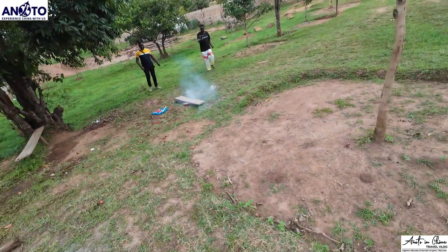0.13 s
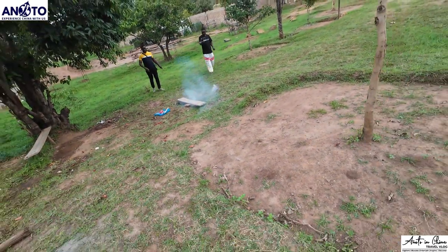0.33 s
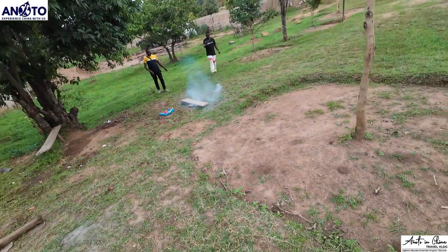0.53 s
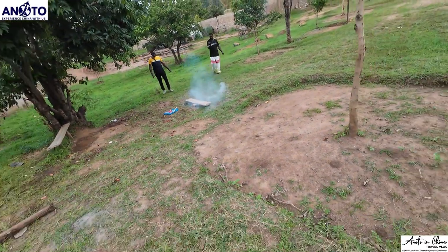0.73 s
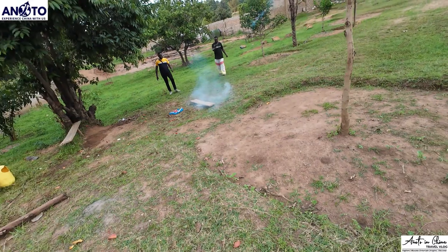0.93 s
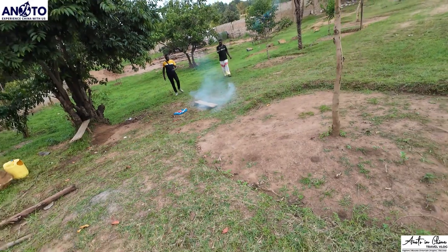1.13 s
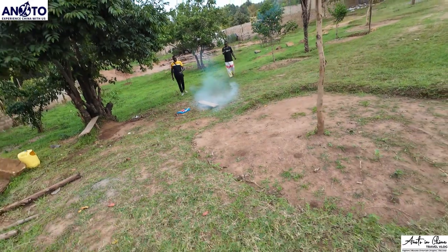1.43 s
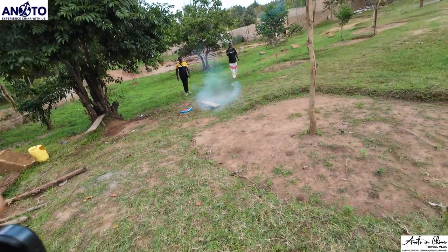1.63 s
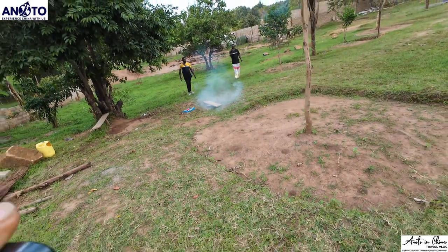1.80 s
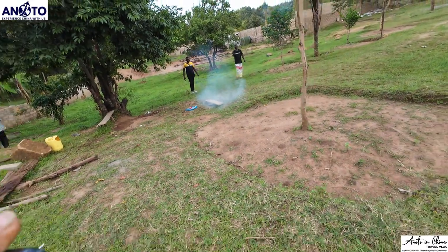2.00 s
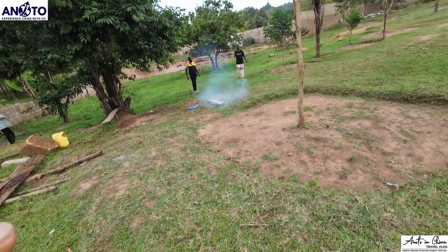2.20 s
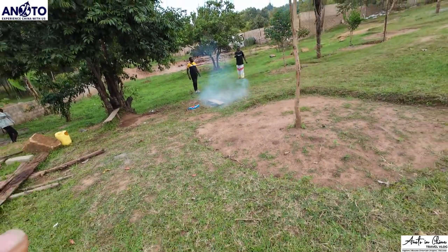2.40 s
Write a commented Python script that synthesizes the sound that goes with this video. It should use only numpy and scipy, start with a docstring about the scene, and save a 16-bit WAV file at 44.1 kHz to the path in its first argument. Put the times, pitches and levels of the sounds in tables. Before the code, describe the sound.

A rapid, irregular run of loud firecracker bangs, followed by a fading outdoor echo.

```python
"""Firecrackers on a lawn

A string of crackers bursts some metres away. Each shock overloads the microphone, scatters off grass
and trees, slaps back from walls and rolls away; a limiter ducks around the bangs.
As the echoes die, a distant engine hums and a bird chirps faintly."""
import sys
import numpy as np
from scipy import signal
from scipy.fft import rfft, irfft, next_fast_len
from scipy.io import wavfile
from scipy.ndimage import uniform_filter1d, minimum_filter1d, map_coordinates

SR = 44100
rng = np.random.default_rng(int(sys.argv[2]) if len(sys.argv) > 2 else 0)


def waveform_to_disk(signal):
    """Save audio, clipped to [-1, 1], as 16-bit WAV at the path in sys.argv[1]."""
    frames = np.transpose(np.atleast_2d(signal))
    scaled = np.clip(frames, -1, 1) * 32767
    samples = np.round(scaled).astype(np.int16)
    wavfile.write(sys.argv[1], SR, samples)


N = 112454

# start_s, blast_db, shock_ms, crack_db, bounce_db, scatter_db, echo_db, swing_ratio, swing_left_db
BANGS = [(-.2, 16, 0.34, 0, -10, 1, -18.5, .3, -3), (.1192, 11, 0.59, -2.5, -6, -3.5, -17.5, 0.78, 8.5),
         (.1468, 18.5, 0.91, 4, -18.5, -0.5, -16.5, -0.089, 10),
         (.4311, 19.5, 0.41, 11, -6, 0, -15.5, 0.39, 8), (.5252, 18.5, 0.81, 9, -8, -0.5, -37, 0.52, -2.5),
         (.6174, 20, 0.79, 0, -19, -8.5, -23, 0.98, -3), (.6462, 18, .5, 2, -16, -4.5, -21, -0.04, 28),
         (.7652, 17.5, 0.87, 6.5, -6.5, 2, -14.5, 0.57, 0.5), (.9802, 18, 1, 7, -9, 1, -17.5, 0.75, 9.5),
         (1.1449, 18.5, 0.83, 8, -10.5, 1.5, -18.5, 0.69, -7),
         (1.2597, 14, 1, 11.5, -15, 0, -15.5, .08, -2), (1.441, 8, .12, 9, -17, -7.5, -21.5, 0, 0),
         (1.4505, 12.5, 0.36, 12.5, -7, 1, -18, 0, 0), (1.4699, 21.5, 0.58, 18, -23, 0, -16, 1.28, 4),
         (1.5241, 22, 0.73, 10.5, -14, 0, -20, 0.43, 4.5)]
# wall slaps: delay_s, gain_db
WALLS = [(0.0551, -22.5), (0.201, -28)]
# noise spectra: freq_hz, density_db
CRACK_SPECTRUM = [(60, -50), (300, -12), (900, 5), (1600, -3.5), (3000, -5.5), (6000, -17.5), (15000, -19)]
SCATTER_SPECTRUM = [(40, -17), (200, -2), (550, -3), (1000, 1), (2500, 3), (4000, -1.5), (6000, -4),
                    (9000, -6), (15000, -10)]
ECHO_SPECTRUM = [(30, 19.5), (60, 4), (120, 1), (230, 4), (400, -0.5), (600, -1), (900, 0), (2600, 2),
                 (5000, -2), (8000, -4.5), (15000, -5)]
AIR_SPECTRUM = [(25, -15), (100, -16), (350, -20.5), (800, -8), (2000, -20), (4000, -27), (7000, -43),
                (15000, -44)]
HISS_SPECTRUM = [(500, -32), (3000, 0.5), (6000, -15), (8000, -16), (14000, -19.5)]
TICK_SPECTRUM = [(1500, -29), (2700, -4), (3500, -1), (4200, -7), (5500, -34)]
# wall and microphone responses: freq_hz, gain_db
WALL_RESPONSE = [(200, -39), (900, -2.5), (1900, 5), (3500, -34), (8000, -17.5)]
MIC_RESPONSE = [(3000, 1), (6000, 2), (7200, -4), (8200, -1), (10200, 0.5), (11700, -4), (13700, 5.5),
                (15000, -4.5), (16000, -26)]
# microphone imbalance: freq_hz, left_boost_right_cut_db
MIC_LEAN = [(1000, -0.22), (5000, 1), (9000, -1.3), (14000, -1.2)]
# far echo decay: freq_hz, t60_s
ECHO_T60 = [(40, 1.2), (200, 1.56), (400, 0.96), (1000, 1.86), (3000, 1.42), (5000, 1.116), (8000, 0.9),
            (14000, 0.53)]
# left-right likeness of noise: freq_hz, correlation
COHERENCE = [(100, 1), (500, 1), (1000, 0.97), (2500, 0.95), (5000, .55), (8000, 0.2), (13000, -0.1)]
# engine hum: shaft_multiple, level_db
ENGINE_ORDERS = [(2, -46), (3, -44), (4, -55.5), (5, -67), (7, -49), (8, -46.5), (10, -76)]
# bird: start_s, length_s, from_hz, to_hz, level_db
CHIRPS = [(1.972, .022, 3700, 3050, -39), (2.257, .02, 3950, 3850, -43), (2.25, .035, 3000, 2500, -47)]


def shock(t, length_s, rise_s=0.00004, drive=2.05):
    """Pressure pulse: steep front, flattened top, weak opposite tail."""
    front = 1 - np.exp(-t / rise_s)
    return -front * np.tanh(drive * (1 - t / length_s) * np.exp(-t / length_s))


def blasts(bounce_s=0.00249):
    """Each cracker: a shock, its ground bounce and a short ragged crack."""
    shocks, crack_power = np.zeros(N), np.zeros(N)
    for start_s, blast_db, shock_ms, crack_db, bounce_db, *_ in BANGS:
        t, length_s = since(start_s), shock_ms / 1000
        bounce = amp(bounce_db) * shock(since(start_s + bounce_s), length_s)
        shocks += amp(blast_db) * (shock(t, length_s) + bounce)
        crack_t60_s = 21 * length_s
        crack_power += (t > 0) * amp(crack_db - 60 * t / crack_t60_s) ** 2
    return shocks + np.sqrt(crack_power) * noise(CRACK_SPECTRUM)


def overload(delay_s=0.00096, rise_s=0.0021, cross_s=0.017, decay_s=0.022):
    """Shocks throw each microphone off centre: low thump, undershoot, subsonic rebound."""
    out = np.zeros((2, N))
    for start_s, blast_db, *_, swing_ratio, left_db in BANGS:
        t = since(start_s + delay_s)
        thump = (1 - np.exp(-t / rise_s)) * (1 - t / cross_s) * np.exp(-t / decay_s)
        rebound = swell(t, peak_s=0.18, width_s=0.13) * (t > 0)
        out += swing_ratio * amp(blast_db + left_db * np.array([[0.5], [-0.5]])) * thump
        out += abs(swing_ratio) * amp(-11.5) * rebound
    return out


def wall_slaps(direct):
    """Two walls return delayed, midrange-heavy copies."""
    slap = filtered(direct, lambda hz: amp(along(WALL_RESPONSE, hz)))
    return sum(amp(gain_db) * delayed(slap, delay_s) for delay_s, gain_db in WALLS)


def scatter():
    """Grass and near foliage throw back a bright, fast-dying spray."""
    power = sum(tail_power(since(start_s), scatter_db, rise_s=0.0033, t60_s=0.19)
                for start_s, *_, scatter_db, _, _, _ in BANGS)
    return np.sqrt(power) * noise(SCATTER_SPECTRUM, grain_db=2)


def echoes():
    """Far trees and hillside return a long roll, grainy from single trunks; treble dies first."""
    hz, frame_s, bins = signal.stft(noise(ECHO_SPECTRUM, grain_db=1.5), SR, nperseg=256)
    t60_s = along(ECHO_T60, hz)[:, None]
    power = sum(tail_power(np.maximum(frame_s - start_s, 0), echo_db, rise_s=0.057, t60_s=t60_s)
                for start_s, *_, echo_db, _, _ in BANGS)
    return signal.istft(bins * np.sqrt(power), SR, nperseg=256)[1][:, :N]


def engine(shaft_hz=24):
    """A distant engine throbs on low multiples of its shaft speed."""
    return sum(amp(db) * np.sqrt(2) * np.sin(2 * np.pi * (order * shaft_hz * since(0) + rng.random()))
               for order, db in ENGINE_ORDERS)


def bird():
    """Short falling chirps."""
    out = np.zeros(N)
    for start_s, length_s, from_hz, to_hz, level_db in CHIRPS:
        progress = np.minimum(since(start_s) / length_s, 1)
        pitch_hz = from_hz + (to_hz - from_hz) * progress
        envelope = amp(level_db) * np.sin(np.pi * progress) ** 2
        out += envelope * np.sin(2 * np.pi * np.cumsum(pitch_hz) / SR)
    return out


def air():
    """Quiet outdoor air, one faint swell of hiss, one soft tick."""
    bed = amp(-54.5) * noise(AIR_SPECTRUM)
    hiss = amp(-51.5) * swell(since(0), peak_s=2.233, width_s=0.11) * noise(HISS_SPECTRUM)
    tick = amp(-49.5) * swell(since(0), peak_s=2.416, width_s=0.01) * noise(TICK_SPECTRUM)
    return bed + hiss + tick


def limiter(x, threshold_db=-3.5, ahead_s=0.029, hold_s=0.0076, release_db_per_s=146):
    """Ducks ahead of each peak, holds, recovers at a steady rate."""
    rms = np.sqrt(np.abs(uniform_filter1d(np.mean(x ** 2, axis=0), size=88)) + 1e-12)
    over_db = np.maximum(20 * np.log10(rms) - threshold_db, 0)
    recovery_db = release_db_per_s * since(0)
    cut_db = np.maximum.accumulate(over_db + recovery_db) - recovery_db
    ramp_n = 2 * int(ahead_s * SR / 2) + 1
    span_n = ramp_n + int(hold_s * SR)
    held_gain = minimum_filter1d(amp(-cut_db), span_n, origin=-(span_n // 2))
    return x * uniform_filter1d(held_gain, ramp_n, origin=ramp_n // 2)


def noise(spectrum, grain_db=0, grains_per_s=450):
    """Stereo noise, rms 1, mono in the bass, clumped by grain_db."""
    def mid_side_gains(hz):
        angle = np.arccos(np.clip(along(COHERENCE, hz), -1, 1)) / 2
        return amp(along(spectrum, hz)) * [np.cos(angle), np.sin(angle)]
    clumps = map_coordinates(rng.standard_normal(4096), [since(0) * grains_per_s], mode="wrap")
    white = rng.standard_normal((2, N)) * amp(grain_db * clumps)
    mid, side = filtered(white, mid_side_gains)
    stereo = np.array([mid + side, mid - side])
    return stereo / np.sqrt(np.mean(stereo ** 2) + 1e-20)


def tail_power(t, level_db, rise_s, t60_s):
    """Power of reflections that build, then decay."""
    return (amp(level_db - 60 * t / t60_s) * (1 - np.exp(-t / rise_s))) ** 2


def swell(t, peak_s, width_s):
    """Gaussian envelope."""
    return np.exp(-((t - peak_s) / width_s) ** 2)


def amp(db):
    """Decibels to gain."""
    return 10 ** (np.asarray(db) / 20)


def along(points, hz):
    """Interpolates a table over log frequency."""
    freq_hz, values = np.transpose(points)
    return np.interp(np.log(hz + 1), np.log(freq_hz + 1), values)


def since(start_s):
    """Seconds since start_s, zero before."""
    return np.maximum(np.arange(N) / SR - start_s, 0)


def filtered(x, response):
    """Zero-phase filter with gain response(hz)."""
    size = next_fast_len(N + 8192)
    return irfft(rfft(x, size) * response(np.fft.rfftfreq(size, 1 / SR)), size)[..., :N]


def delayed(x, delay_s):
    """Stereo delay."""
    return np.pad(x, ((0, 0), (round(delay_s * SR), 0)))[:, :N]


def scene():
    """Bangs and echoes over a quiet garden."""
    direct = blasts()
    return direct + overload() + wall_slaps(direct) + scatter() + echoes() + engine() + bird() + air()


def record(dry, ceiling=0.76, top_hz=16300):
    """Microphone colour, limiter, soft clipping, band limit."""
    x = filtered(dry, lambda hz: amp(along(MIC_RESPONSE, hz) + np.outer([1, -1], along(MIC_LEAN, hz))))
    x = limiter(x)
    x = x / (1 + np.abs(x / ceiling) ** 10) ** (1 / 10)
    return filtered(x, lambda hz: hz < top_hz)


dry = scene()
out = record(dry)
waveform_to_disk(out)
```